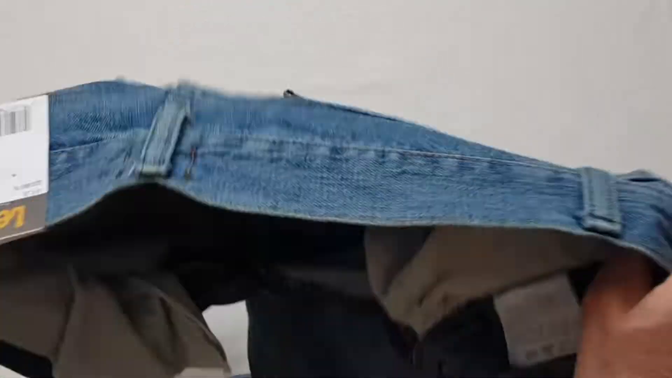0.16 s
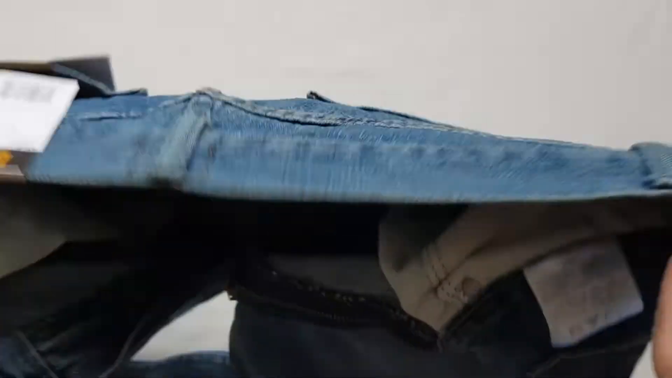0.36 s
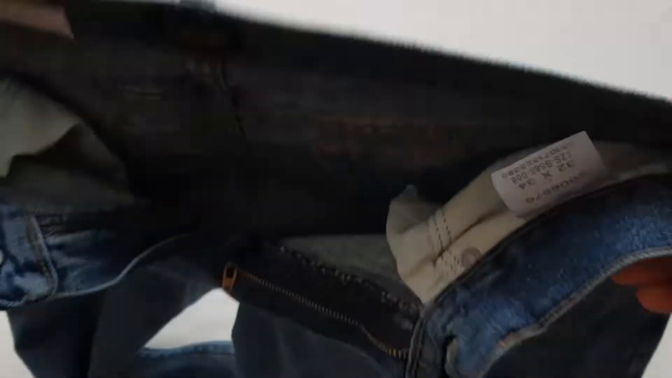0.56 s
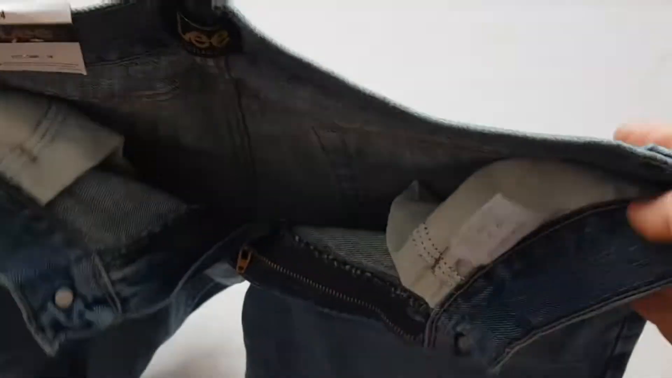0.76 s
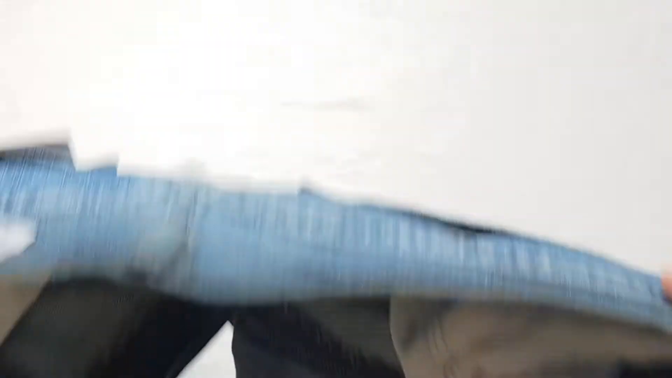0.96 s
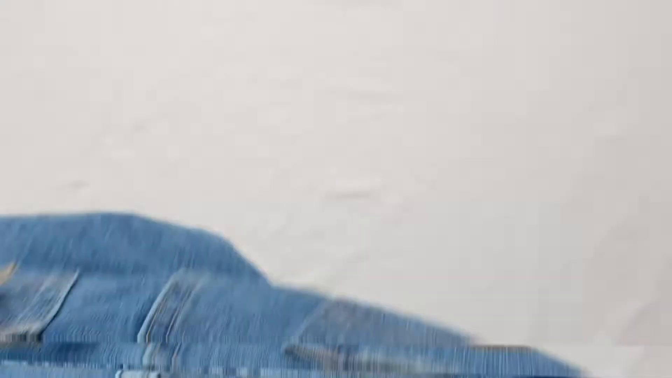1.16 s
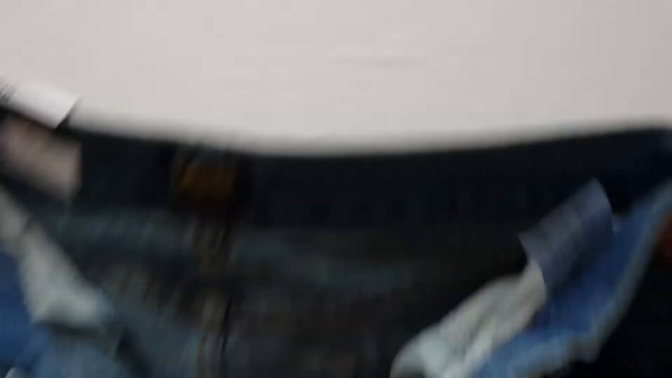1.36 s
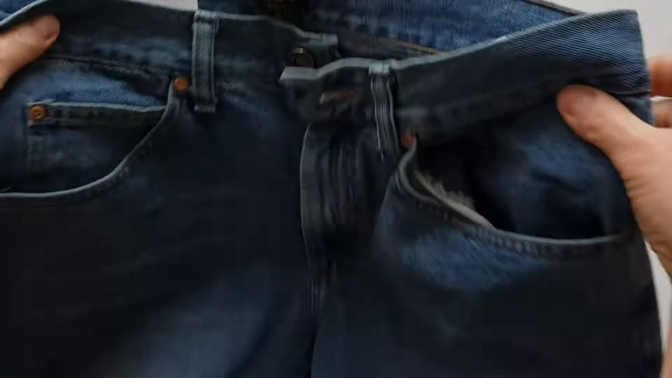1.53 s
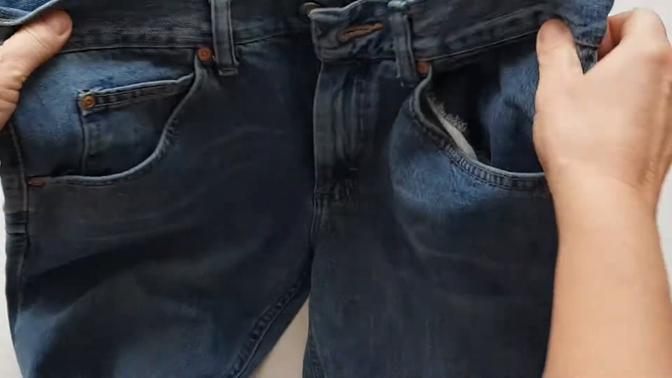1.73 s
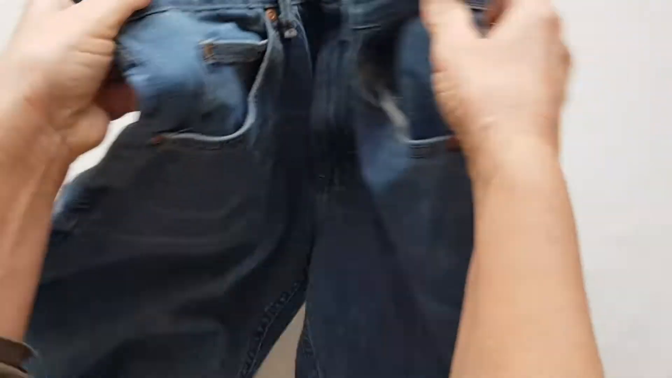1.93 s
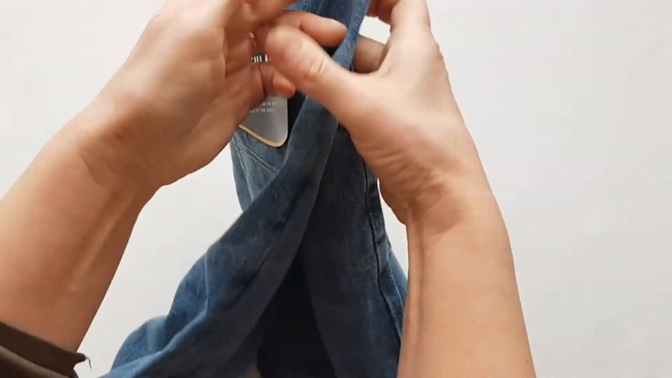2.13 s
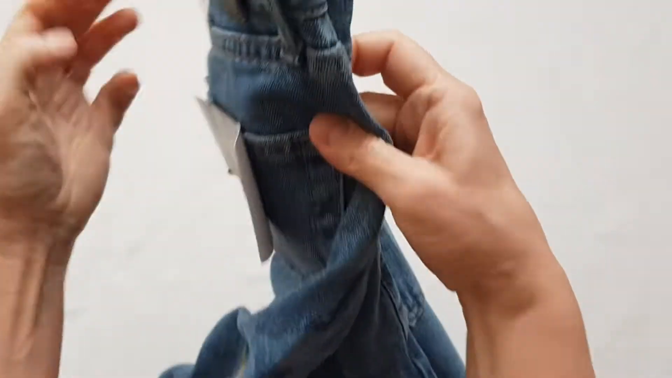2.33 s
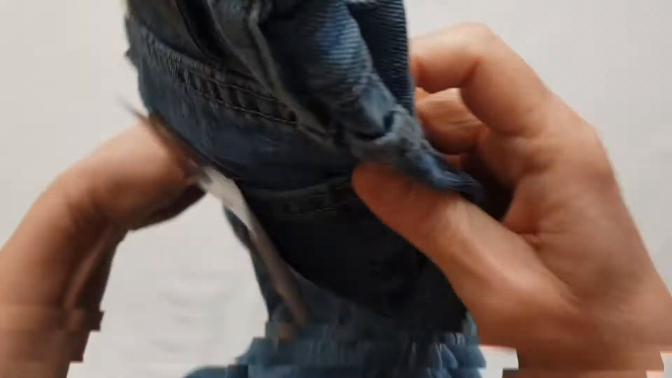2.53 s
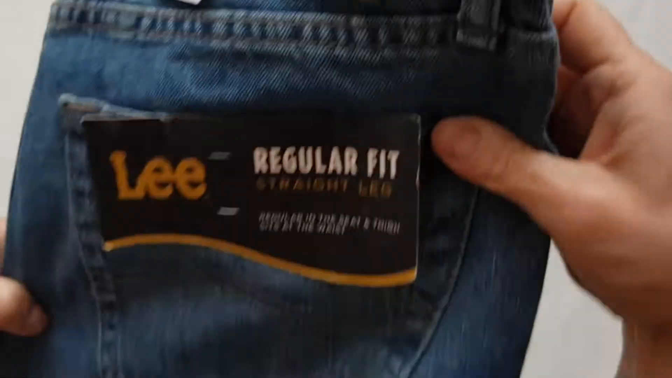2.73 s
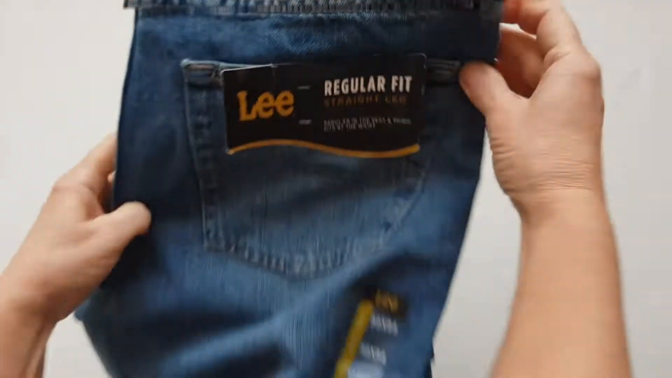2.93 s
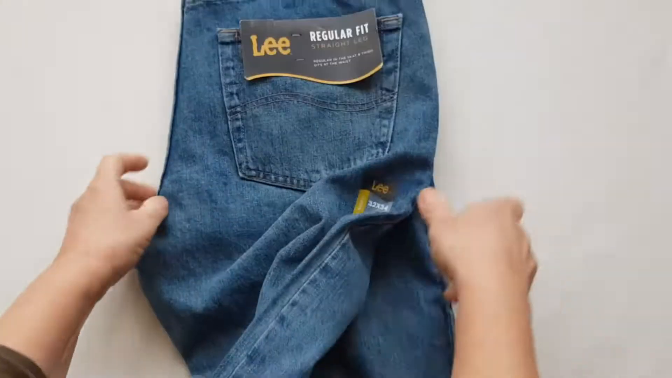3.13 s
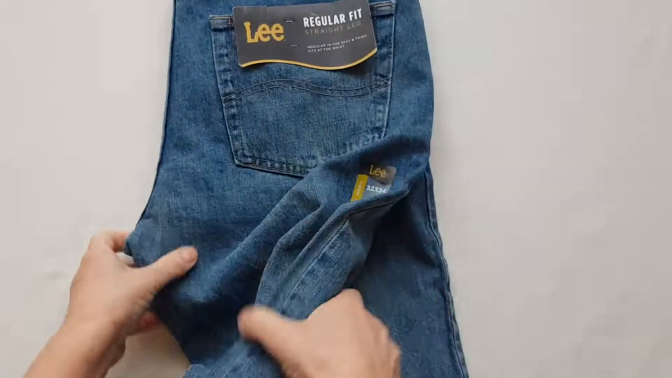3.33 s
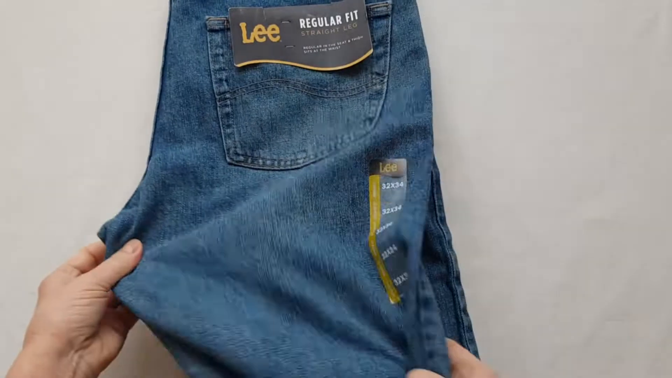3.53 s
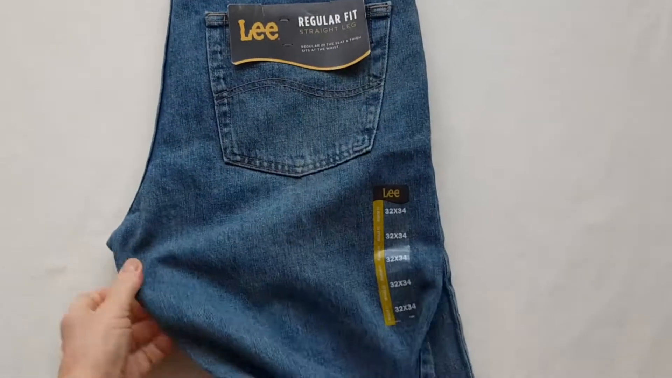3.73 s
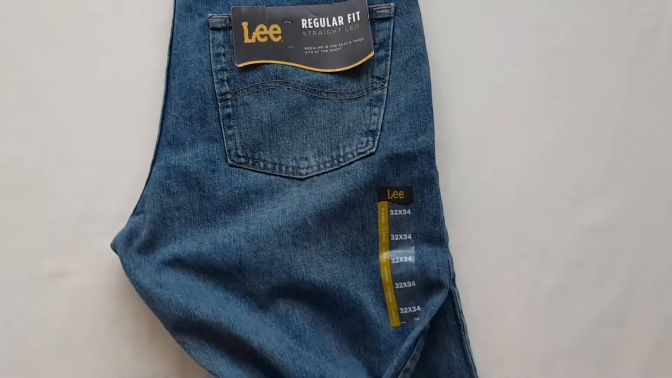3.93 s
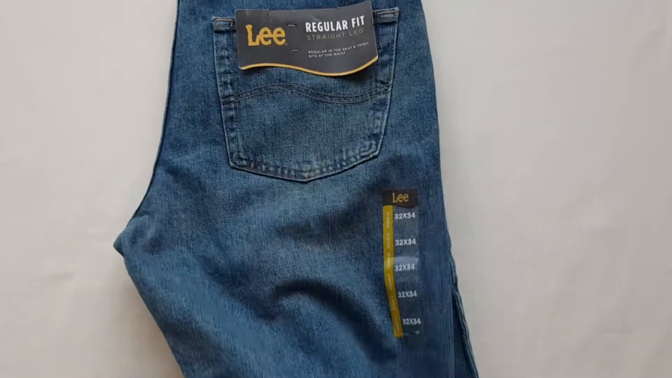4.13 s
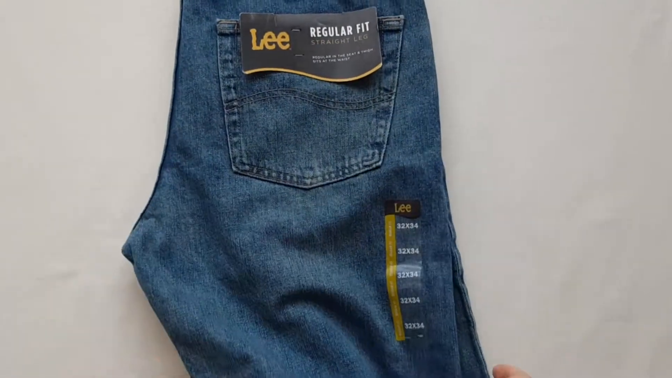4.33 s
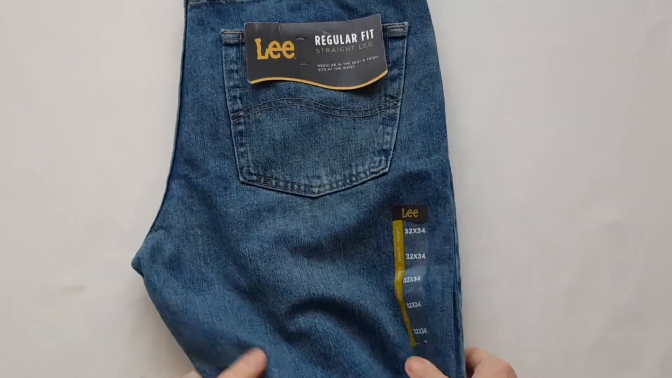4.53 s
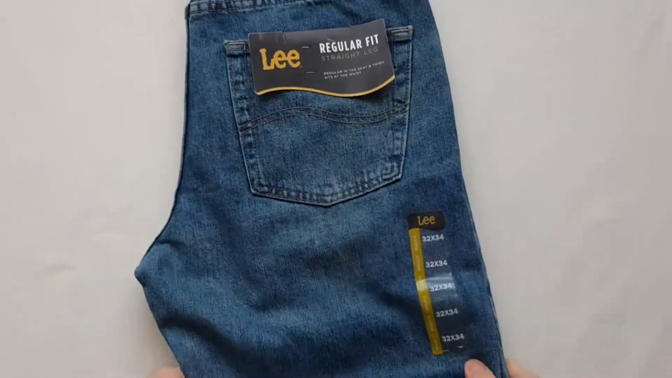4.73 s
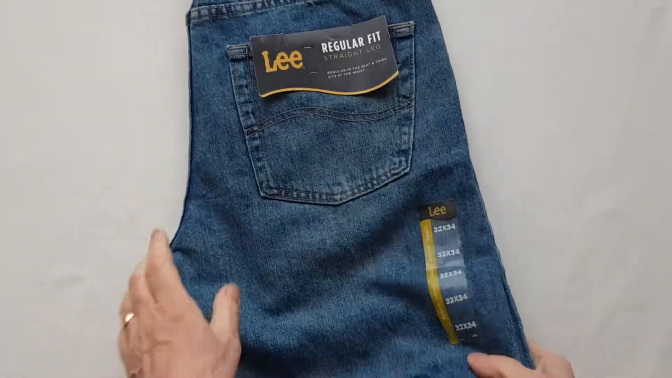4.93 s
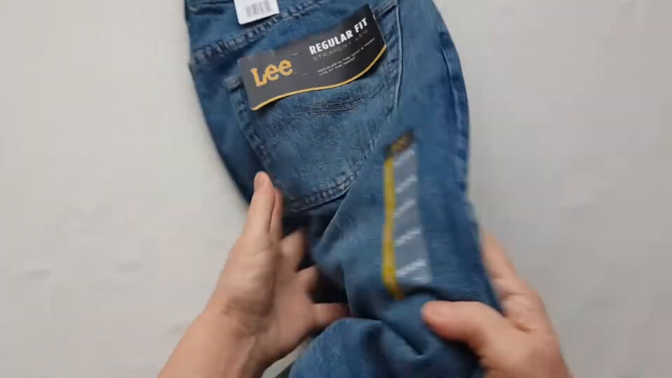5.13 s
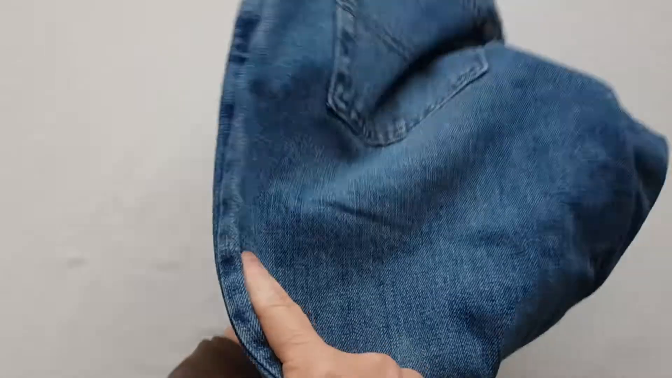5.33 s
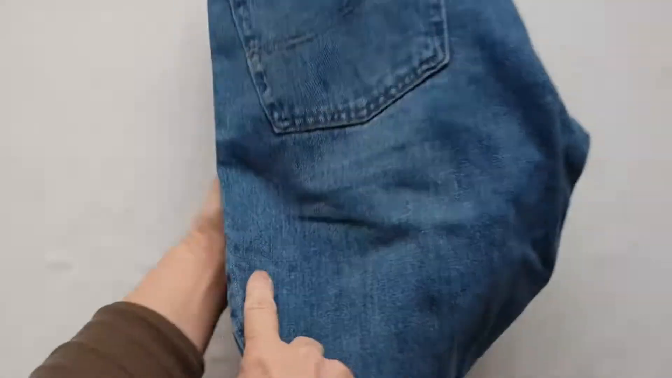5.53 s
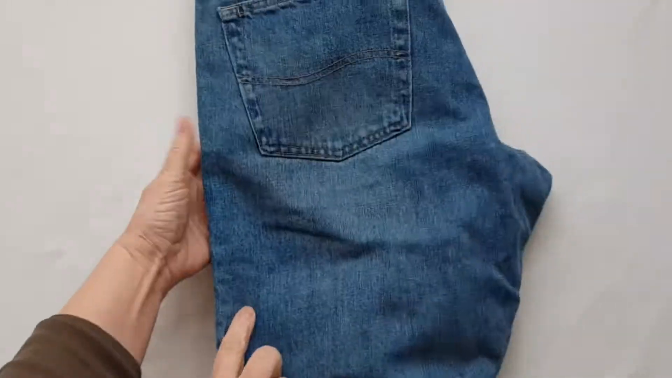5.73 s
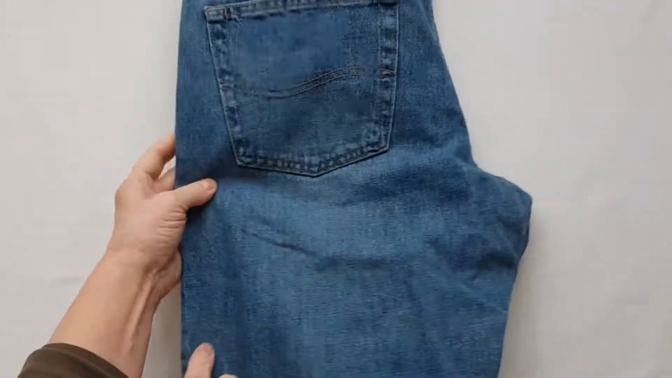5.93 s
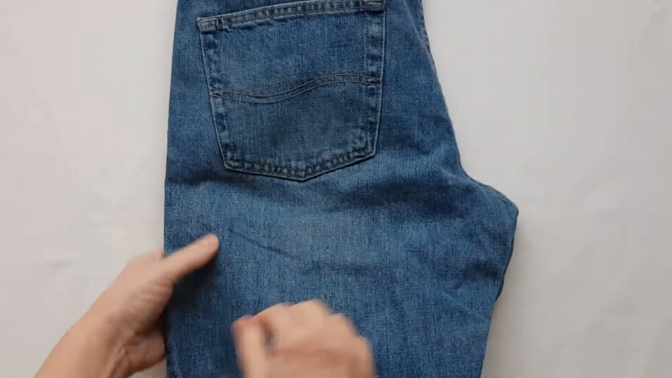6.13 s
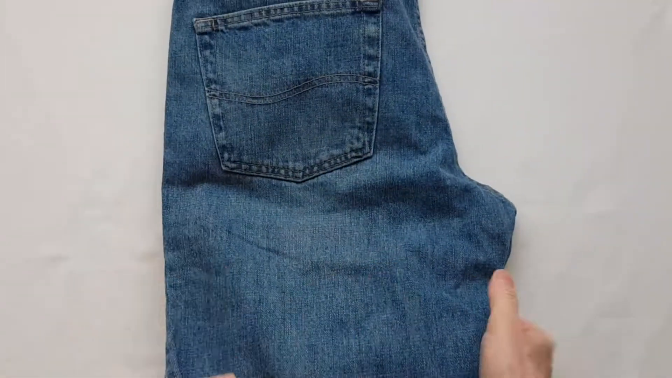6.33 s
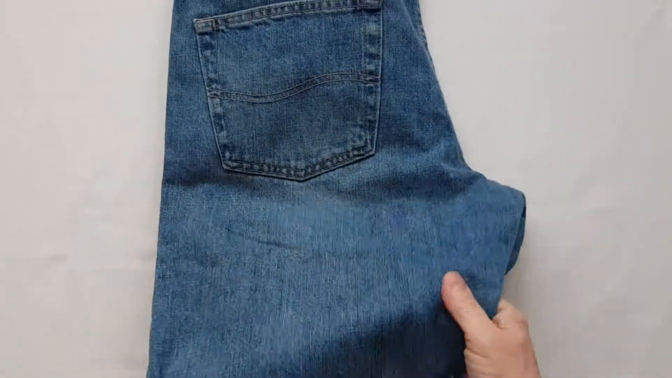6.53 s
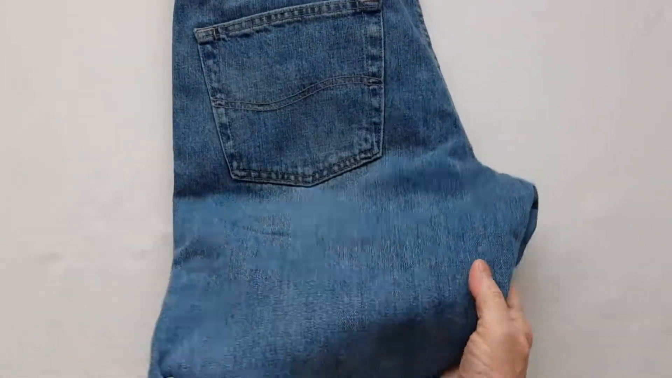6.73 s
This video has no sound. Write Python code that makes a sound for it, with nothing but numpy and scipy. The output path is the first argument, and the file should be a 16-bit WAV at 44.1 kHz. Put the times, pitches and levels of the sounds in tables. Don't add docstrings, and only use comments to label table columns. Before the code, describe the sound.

Thick denim being handled on a tabletop: muffled thuds, coarse dragging and dry crackles at first, a brief lull, then a strong double thud. A firm rap, a heavy cloth landing and the loudest woody knock follow with small rebounds. Afterwards soft brushing, little clicks and pats, one more solid flop, and quiet sliding. Close stereo pickup, short soft room echo, low steady hiss.

```python
import sys
import numpy as np
from scipy import signal
from scipy.fft import rfft, irfft, next_fast_len
from scipy.io import wavfile
from scipy.ndimage import uniform_filter1d

SR = 44100
rng = np.random.default_rng(int(sys.argv[2]) if len(sys.argv) > 2 else 0)


def int16_out(signal):
    q = np.round(np.clip(np.atleast_2d(signal).T, -1, 1) * 32767)
    wavfile.write(sys.argv[1], SR, q.astype(np.int16))


def voltage_ratio(decibels):
    exponent = np.asarray(decibels, float) / 20
    return 10 ** exponent


N = 298998

# [pitch_hz, level_db]
FLOOR_COLOUR = [(15, -32), (25, 18), (97, 13.5), (224, 1), (302, -18), (1020, -17), (1960, 2.5),
                (2790, -32), (4790, 1), (6110, -6), (12400, -1), (14900, 0.5), (16200, -10)]
# [centre_s, depth_db, half_length_s]
LULLS = [(0.62, 8, 0.11), (0.9, -3.5, 0.026), (1.293, -4, .04), (1.817, 5, .1), (2.366, 3.5, .08),
         (3.24, 10, 0.042), (3.79, 6, .06), (4.396, 11, 0.035), (4.864, 5.5, .08), (5.45, -1, 0.08),
         (6.2, 0, .1)]
# [pitch_hz, t60_s]
ROOM_DECAY = [(100, 1), (400, 0.3), (2000, 0.088), (10000, 0.17)]
# [pitch_hz, correlation]
ALIKE = [(100, 0.6), (500, 0.36), (1200, 0.017), (4000, 0)]
# [pitch_hz, level_db]
LEAN = [(60, 2), (600, 4.5), (1300, -1), (4400, 1.5), (8100, 12), (15000, 1)]
# [centre_hz, width_hz, depth_db]
PORT_NOTCHES = [(2740, 287, 2), (5760, 990, 1.5)]
# [pitch_hz, level_db]
DRAG_COLOUR = [(470, -5), (760, -6), (1000, -3), (1400, -3.5), (1800, -6.5), (2340, -18), (3960, -120)]
SCRAPE_COLOUR = [(1030, -21), (1750, -3.5), (2250, -4), (2900, -8.5), (3770, -13.5), (6380, -120)]
BRUSH_COLOUR = [(1530, -3), (2600, -4.5), (3050, -3), (3750, 0.5), (4050, 1.5), (5190, 0), (6800, -8.5),
                (8840, -42), (15000, -120)]
FIBRE_COLOUR = [(3530, -12.5), (6000, -8.5), (6660, -5), (7830, -3), (9090, -0.5), (10500, -5), (12300, 0),
                (15000, -7.5), (16200, -8)]
# [start_s, drag_db, rise_s, fall_s, scrape_over_drag_db]
DRAGS = [(-0.007, -45.5, 0.02, 0.063, -4), (0.165, -50, 0.047, 0.098, -2),
         (0.403, -69.5, 0.0028, 0.37, 0.5), (0.755, -61.5, 0.045, 0.05, 8),
         (1.069, -65.5, 0.028, 0.087, 11.5), (1.13, -58.5, 0.011, 0.07, 6.5),
         (1.33, -58.5, 0.0051, 0.17, 0), (2.028, -49.5, .006, 0.014, 5.5), (2.095, -64, .004, 0.035, 5),
         (1.488, -48.5, 0.067, 0.044, -2.5), (1.601, -49.5, 0.018, 0.044, -10),
         (1.984, -55, 0.0091, 0.096, 4.5), (2.543, -48, 0.0017, 0.059, -12),
         (2.69, -53.5, 0.13, 0.044, -5.5), (2.98, -63, 0.12, 0.018, -4.5), (3.07, -39, 0.017, 0.049, -5),
         (3.282, -60, 0.0068, 0.1, -12), (3.533, -55, 0.0017, 0.039, 2), (3.575, -56.5, 0.093, 0.07, 1.5),
         (3.902, -59, 0.017, 0.15, -4.5), (4.274, -61.5, 0.09, 0.055, -5.5),
         (4.43, -49, 0.0015, 0.069, -2.5), (4.621, -53, 0.057, 0.081, -6.5), (5.106, -49, 0.055, 0.12, -3),
         (5.585, -55, 0.04, 0.033, -3), (5.628, -44.5, 0.0055, 0.054, -9), (6.035, -61, 0.17, 0.036, -3),
         (6.43, -61.5, 0.15, 0.37, -3)]
# [start_s, brush_db, rise_s, fall_s, fibre_over_brush_db]
SWEEPS = [(-0.025, -54, 0.0019, 0.16, 0), (0.148, -58.5, 0.035, 0.49, -0.2), (0.767, -53.5, 0.041, 0.04, 4),
          (1.032, -53.5, 0.0061, 0.017, -5), (0.99, -59, 0.019, 0.054, 1.5), (1.09, -55.5, 0.033, .05, 1),
          (5.24, -59.5, 0.043, .03, -1), (1.135, -54, 0.017, 0.063, 3), (1.19, -59.5, 0.023, 0.14, 0.5),
          (1.35, -53, 0.014, .07, 1.5), (1.435, -57.5, 0.014, 0.016, 8), (1.47, -58, 0.015, 0.058, 0),
          (2.1, -52.5, 0.0042, 0.033, -11), (3.11, -50, .008, 0.021, -7), (3.89, -61, .03, 0.057, 0),
          (1.574, -60.5, 0.0081, 0.091, 1.7), (2.019, -57, 0.067, 0.12, 2),
          (2.219, -54.5, 0.019, 0.028, -0.5), (2.702, -55, 0.1, 0.052, 1.5), (2.887, -62.5, 0.032, 0.13, 5),
          (3.079, -49, 0.02, 0.027, -10.5), (3.339, -62.5, 0.024, 0.16, 2), (3.539, -52, 0.048, 0.068, -1),
          (4.025, -57.5, 0.14, 0.15, -3), (4.206, -58.6, 0.02, 0.054, 4.5),
          (4.428, -59, 0.00097, 0.043, -12), (4.711, -59, 0.084, 0.038, 2.5), (5.118, -56, 0.074, 0.12, 0),
          (5.649, -55.5, 0.063, 0.046, -2.5), (6.011, -62, 0.18, 0.077, 2), (6.465, -58, 0.089, 0.23, 0.5)]
# [start_s, level_db, brightness_db]
FLICKS = [
    (0.285, -64.5, 8.5),
    (1.126, -64, 3),
    (1.462, -44, -6.5),
    (1.979, -49.5, -6.5),
    (2.095, -59.5, 2),
    (2.542, -62, -12),
    (3.059, -56.5, 3),
    (4.428, -64, -4),
    (4.561, -65.5, 0),
    (4.656, -64, -17),
]
# [start_s, peak_db, pitch_hz, length_s]
SCUFFS = [(1.975, -49, 1400, 0.0084), (2.025, -47, 1300, 0.018), (4.5, -62.5, 970, .03),
          (5.582, -47.5, 2500, 0.04), (5.41, -57.5, 700, 0.044), (5.503, -58, 600, .03),
          (5.615, -55, 2300, .05), (0.76, -63, 300, .08), (3.93, -66, 4000, 0.067), (5.2, -63, 560, .05),
          (1.3, -59.5, 440, .05), (0.74, -59.5, 2150, .06), (1.4, -58, 440, 0.017), (6.27, -67, 1800, 0.13),
          (1.125, -52, 2200, 0.056), (1.35, -57, 4400, 0.035), (0.415, -59, 2300, 0.033),
          (5.95, -60, 1800, 0.077), (6.33, -57, 1700, .06), (6.4, -66, 450, 0.1), (5.86, -63, 1600, .06),
          (6.0, -62.5, 310, 0.17), (2.5, -58, 410, 0.064), (1.6, -59, 200, 0.062), (6.66, -58, 470, .1),
          (2.095, -58, 1200, 0.043), (2, -52, 830, 0.028)]
# [start_s, peak_db, pitch_hz, t60_s]
CRACKLES = [(0.021, -40, 1100, .012), (0.038, -38, 1100, 0.012), (0.174, -39.5, 1020, 0.036),
            (0.283, -48, 864, 0.013), (0.39, -45.5, 802, 0.0076), (0.42, -53, 1080, 0.016),
            (0.44, -48, 783, .012), (1.037, -48, 11300, 0.006), (1.0368, -39, 4480, .002),
            (2.575, -48, 1500, .008), (4.437, -56, 7500, .008), (4.432, -56, 4600, .012),
            (1.133, -50, 2220, .008), (1.166, -49, 4500, .005), (1.232, -52, 1410, 0.009),
            (1.243, -50, 9500, .004), (1.264, -51, 2140, 0.0061), (1.279, -50, 2260, 0.007),
            (1.323, -55, 2380, .008), (1.355, -50, 3710, 0.0086), (1.419, -49, 900, .01),
            (1.432, -41, 805, 0.014), (1.447, -51, 1200, .008), (1.4628, -30, 13500, .0015),
            (1.463, -39.5, 7000, 0.0044), (1.463, -35, 3320, 0.0065), (1.58, -53, 1140, .01),
            (1.59, -48, 1130, .01), (1.603, -48, 3600, .005), (1.611, -42, 860, 0.0093),
            (1.998, -42, 1500, .006), (2.027, -42, 1410, 0.0087), (2.034, -43, 1190, 0.0083),
            (3.043, -43, 999, .012), (3.084, -41, 867, 0.014), (3.115, -33, 1540, .008),
            (3.281, -53, 969, 0.011), (3.531, -46, 1020, .015), (3.609, -50, 1500, .006),
            (6.355, -48.5, 1600, 0.013), (5.051, -48, 557, 0.017), (5.065, -52, 520, .02),
            (4.36, -64, 4900, .008), (4.431, -49, 1100, 0.014), (4.657, -42, 910, 0.0088),
            (5.036, -53, 1080, .01), (5.281, -53, 850, 0.028), (5.589, -43, 2500, .008),
            (5.622, -35, 786, .012), (5.633, -39, 930, 0.013), (6.336, -61, 1620, .01)]
# [start_s, peak_db, pitch_hz, top_ring_db, t60_s]
TICKS = [(0.079, -57.5, 1590, 4.5, 0.0037), (1.036, -34, 3130, -6, 0.0022),
         (1.4631, -30.5, 1550, -19, 0.0033), (1.6022, -40.5, 1530, -22, 0.0026),
         (2.0937, -48.5, 1480, -27, 0.011), (2.541, -39.5, 1530, -40, 0.0063),
         (3.531, -54, 1460, -31.5, 0.003), (4.561, -52, 1400, -15, 0.004),
         (4.657, -50.5, 1950, -28, 0.0087), (6.354, -60, 1660, -22, 0.012), (6.454, -54, 1550, -19, 0.0091)]
# [start_s, peak_db, pitch_hz, t60_s]
THUMPS = [(0.012, -26, 111, 0.049), (0.17, -31.5, 150, 0.059), (0.325, -37, 160, 0.083),
          (1.446, -30.5, 109, 0.15), (1.59, -41, 137, 0.11), (2.004, -38, 162, 0.031),
          (3.045, -36.5, 124, 0.17), (3.105, -25, 115.4, 0.12), (3.131, -31, 128.3, 0.2),
          (3.531, -49.5, 150.6, 0.28), (6.37, -59.5, 140, .2), (4.442, -45.5, 164, 0.14),
          (4.5, -48, 164, 0.29), (5.545, -51.5, 124, .4), (5.636, -25.5, 141, 0.052),
          (5.658, -31.5, 128, 0.22), (5.77, -48.5, 138.3, 0.24), (5.985, -40.5, 144.4, 0.15),
          (6.08, -52, 190, 0.084), (1.175, -52, 90.5, 0.12), (0.845, -60.5, 130, 0.067)]
# [centre_hz, width_hz, level_db]
TABLE_FRAME = [(45.5, 36.5, -1.2), (73.5, 17.7, 0.66)]
TABLE_LOW = [(124, 14, -12), (164, 9.2, -10.5)]
TABLE_HIGH = [(224.4, 21, -7.5), (288.4, 6.4, 2.5), (365, 42, -1.5), (508, 34, -2.5), (596, 54, -6),
              (790, 132, -8.5), (1075, 13, -19)]
# [start_s, level_db, rise_s, fall_s]
SHOVES = [(0.024, -31, 0.075, 0.014), (0.2, -36, 0.044, 0.11), (0.85, -60.5, 0.028, 0.042),
          (1.21, -50, 0.041, 0.031), (2.25, -63.5, .05, 0.055), (3.7, -58, .04, .06),
          (5.35, -59, .03, 0.048), (1.422, -35.5, 0.033, 0.05), (2.019, -50, 0.047, 0.05),
          (2.592, -52, 0.035, 0.075), (3.099, -42, 0.034, 0.11), (3.52, -49, 0.015, 0.13),
          (4.536, -57.5, 0.094, 0.15), (5.127, -69, 0.071, 0.123), (5.653, -61, 0.06, 0.17),
          (5.676, -40, 0.0411, 0.038), (6.0, -56, 0.015, 0.05), (6.395, -66, 0.02, 0.04)]
# [start_s, seam_patter_db, rise_s, fall_s, low_modes_over_patter_db]
LANDINGS = [(-0.002, -29.5, 0.0031, 0.033, -4.5), (0.112, -51, 0.0052, 0.15, 2),
            (0.164, -33.5, 0.0016, 0.033, 1), (0.356, -42, 0.081, 0.057, 1),
            (1.175, -64, 0.0072, 0.047, -4), (1.471, -28, 0.011, 0.012, -13),
            (1.563, -49.5, 0.015, 0.079, -14), (2.02, -53, 0.037, 0.065, 5.5),
            (2.563, -51.5, 0.024, 0.14, -8.5), (3.0, -54, 0.024, 0.36, -13), (3.06, -28, 0.016, 0.061, 1),
            (3.526, -61, 0.0025, 0.042, -14), (3.67, -46.5, 0.12, 0.043, -3),
            (3.904, -61, 0.0137, 0.22, -7), (4.236, -52.5, 0.059, 0.014, -15), (4.436, -56, 0.011, 0.17, 5),
            (4.85, -62.5, .05, 0.099, -14), (5.06, -51.5, 0.095, 0.082, -27), (5.2, -58, 0.033, 0.041, -14),
            (6.1, -69, 0.047, 0.092, 1), (3.3, -56, .05, 0.059, -3), (5.635, -34.5, 0.024, 0.029, 0),
            (5.771, -50, 0.1, 0.085, 0.5), (5.975, -51.5, 0.0074, 0.042, 12), (6.364, -54, 0.01, 0.15, -14)]
# [start_s,
# peak_db, pitch_hz, t60_s]
KNOCKS = [(0.002, -37, 388.5, 0.18), (0.142, -38.5, 353, 0.075), (0.17, -35, 379.6, 0.14),
          (0.216, -34, 204, 0.055), (0.256, -33, 200, .03), (0.284, -34.5, 383, 0.03),
          (0.327, -30, 190, .03), (0.387, -32, 448, 0.023), (1.361, -32, 255, 0.035),
          (1.419, -25.5, 274, 0.029), (1.4465, -16, 230, 0.021), (1.4625, -13.5, 329, 0.025),
          (1.49, -33, 285, 0.0089), (1.587, -31.5, 428, 0.026), (2.028, -42.5, 352, 0.059),
          (2.091, -38, 367, 0.045), (3.063, -24, 408, 0.031), (3.087, -22.5, 212, 0.068),
          (3.1132, -15.5, 263, 0.02), (3.569, -32, 292, 0.072), (0.366, -33, 200, .03),
          (3.65, -29, 380, 0.028), (4.195, -51, 400, 0.057), (4.443, -42.5, 198, 0.074),
          (4.46, -38, 171, 0.048), (4.562, -30.5, 590, 0.018), (4.597, -30, 722, .013),
          (4.608, -37, 600, 0.013), (4.633, -34.5, 596, 0.023), (4.653, -36, 395, 0.025),
          (5.62, -23.5, 208, 0.033), (5.632, -19, 400, 0.036), (5.973, -35.5, 382, 0.045)]
# [start_s, peak_db, pitch_hz]
TAPS = [(0.354, -38, 640), (3.0214, -29.5, 481), (3.098, -28, 790), (0.141, -35, 810), (4.078, -47.5, 713),
        (4.953, -46.5, 540), (5.039, -42, 480), (0.389, -51, 704), (6.353, -54, 575), (6.416, -63, 480),
        (6.48, -46, 485), (6.547, -44, 510)]
# [start_s, peak_db, pitch_hz, t60_s]
RAPS = [
    (2.5408, -17, 490, .017),
    (3.5303, -4, 385, .018),
]
# [start_s, peak_db, pitch_hz, t60_s]
REBOUNDS = [
    (2.547, -32.5, 530, 0.055),
    (3.539, -19.5, 460, 0.025),
    (3.6085, -23.5, 577, .018),
    (3.646, -34, 479, 0.064),
    (3.705, -36, 300, 0.037),
    (3.631, -36, 560, 0.037),
]
# [pitch_ratio, level_db, t60_ratio]
RAP_MODES = [(1, 0, 1), (1.21, -22, 2.5), (0.63, -13, 1.5), (2.7, -16, 0.8)]


def unit(x):
    return x / np.sqrt(np.mean(x ** 2) + 1e-20)


def along(points, hz):
    f, v = np.transpose(points)
    return np.interp(np.log(hz + 1), np.log(f + 1), v)


def filtered(x, response):
    m = next_fast_len(N + SR // 2)
    return irfft(rfft(x, m) * response(np.fft.rfftfreq(m, 1 / SR)), m)[..., :N]


def modes(body):
    def response(f):
        total = 0
        for k, (centre, width, db) in enumerate(body):
            damping = 1j * f * width
            total = total + (-1) ** k * voltage_ratio(db) * damping / (centre ** 2 - f ** 2 + damping)
        return total
    return response


def add_at(out, start_s, sound):
    out[..., round(start_s * SR):][..., :sound.shape[-1]] += sound


def grains(rate, spread_db):
    size = voltage_ratio(spread_db * np.minimum(rng.exponential(size=(2, N)), 3)) * rng.standard_normal((2, N))
    return unit(size * (rng.random(N) < rate / SR))


def strokes(rows, follows=False, lingers=1):
    s, db, rise, fall, *extra = np.transpose(rows)[..., None]
    if extra:
        db = db + follows * extra[0]
    t = np.arange(0, N + 64, 64) / SR
    slope = lambda u: np.exp(np.clip(u, -50, 50))
    swell = voltage_ratio(db) / (slope((s - t) / abs(rise)) + slope((t - s) / abs(fall * lingers)))
    return np.interp(np.arange(N) / SR, t, np.sqrt(np.sum(swell ** 2, 0)))


def rush(source, colour, patchy_db):
    z = signal.stft(source, nperseg=512)[2]
    field = uniform_filter1d(rng.standard_normal(z.shape[1:]), 8, 0)
    field = uniform_filter1d(field, 10, 1)
    patches = voltage_ratio(patchy_db * np.minimum(unit(field), 2))
    pair = signal.istft(z * patches, nperseg=512)[1][:, :N]

    def mid_side(hz):
        turn = np.arccos(np.clip(along(ALIKE, hz), -1, 1)) / 2
        return voltage_ratio(along(colour, hz)) * [np.cos(turn), np.sin(turn)]
    mid, side = filtered(pair, mid_side)
    return unit(np.array([mid + side, mid - side]))


def floor():
    t = np.arange(N) / SR
    dip_db = sum(db * np.exp(-((t - s) / half) ** 2) for s, db, half in LULLS)
    hiss = rush(rng.standard_normal((2, N)), FLOOR_COLOUR, patchy_db=1.2)
    air = filtered(hiss, lambda hz: 1 / (1 + (11500 / (hz + 1)) ** 12))
    return voltage_ratio(-68.0) * (voltage_ratio(-dip_db) * (hiss - air) + voltage_ratio(-0.4 * dip_db) * air)


def room(x):
    hz, t, z = signal.stft(rng.standard_normal((2, SR // 2)), SR, nperseg=256)
    tail = signal.istft(z * voltage_ratio(-60 * t / along(ROOM_DECAY, hz)[:, None]), SR, nperseg=256)[1]
    tail = [tail[0] + 0.2 * tail[1], tail[0] - 0.097 * tail[1]] / np.linalg.norm(tail[0])
    delayed = np.pad(x.mean(0), (260, 0))[None]
    return signal.fftconvolve(delayed, tail, axes=1)[:, :N]


def rustle():
    pops = [(s, db, 0.00038, 0.022, bright_db) for s, db, bright_db in FLICKS]  # rise_s, fall_s
    dull, bright = strokes(pops), strokes(pops, True)
    drag = np.hypot(strokes(DRAGS), dull)
    scrape = np.hypot(voltage_ratio(-2) * strokes(DRAGS, True), dull)
    brush = np.hypot(strokes(SWEEPS), bright)
    fibre = np.hypot(voltage_ratio(-0.56) * strokes(SWEEPS, True, lingers=0.86), bright)
    # gain, colour, share of grains, patchiness in dB
    layers = [(drag, DRAG_COLOUR, 0.94, 2.35), (scrape, SCRAPE_COLOUR, 0.92, 3.0),
              (brush, BRUSH_COLOUR, 0.53, 2.06), (fibre, FIBRE_COLOUR, 0.26, 2.1)]
    out = 0
    for gain, colour, share, patchy_db in layers:
        threads = rng.standard_normal((2, N)) + share * grains(900, spread_db=0.0)
        out = out + gain * rush(threads, colour, patchy_db)
    return voltage_ratio(1.0) * out


def scuffs():
    out = np.zeros((2, N + SR))
    cycles_in_step = 4.5
    for s, db, hz, length in SCUFFS:
        t = np.arange(round(3 * length * SR)) / SR
        wander = rng.standard_normal((2, len(t)))
        rough = unit(uniform_filter1d(wander, size=round(cycles_in_step * SR / hz)))
        swell = 2.42 * (t / length * 3) * np.exp(-t / length * 3)
        add_at(out, s, voltage_ratio(db) * swell * rough * np.sin(2 * np.pi * hz * t))
    return out[:, :N]


def crackles():
    out, t = np.zeros((2, N + SR)), np.arange(SR // 40) / SR
    pans_db = rng.normal(0, 1.1, len(CRACKLES))
    for (s, db, hz, t60), pan_db in zip(CRACKLES, pans_db):
        overtone = 0.13 * np.sin(2 * np.pi * min(1.86 * hz, 15000) * t)
        snap = voltage_ratio(db - 60 * t / t60) * (np.sin(2 * np.pi * hz * t) + overtone)
        add_at(out, s, voltage_ratio([[pan_db], [-pan_db]]) * 1.3 * snap)
    return out[:, :N]


def ticks():
    out, t = np.zeros((2, N + SR)), np.arange(SR // 20) / SR
    for s, db, hz, top_db, t60 in TICKS:
        snap = voltage_ratio(-60 * t / t60) * (np.sin(2 * np.pi * hz * t) + 0.2 * np.sin(2 * np.pi * 4100 * t))
        edge = 0.5 * voltage_ratio(-60 * t / 0.0019) * np.sin(2 * np.pi * 13400 * t)
        ring = voltage_ratio(-60 * t / 0.0063) * np.sin(2 * np.pi * 11200 * t)
        spray = 0.48 * voltage_ratio(-60 * t / 0.0062) * rng.standard_normal((2, len(t)))
        onset = 1 - np.exp(-t / 0.00022)
        add_at(out, s + 0.0007, voltage_ratio(db + 10.0) * onset * (snap + voltage_ratio(top_db) * (ring + spray + edge)))
    return out[:, :N]


def thumps():
    out, t = np.zeros(N + SR), np.arange(SR // 2) / SR
    onset = 1 - np.exp(-t / 0.0023)
    for s, db, hz, t60 in THUMPS:
        add_at(out, s, voltage_ratio(db + 5.5 - 60 * t / t60) * onset * np.sin(2 * np.pi * hz * t))
    return out[:N]


def table():
    weight = voltage_ratio(-5) * strokes(LANDINGS, True, lingers=1.24)
    patter = voltage_ratio(-5.0) * strokes(LANDINGS)
    # gain, modes, pats per second, side level in dB
    layers = [(strokes(SHOVES), TABLE_FRAME, 1500, -14), (weight, TABLE_LOW, 1500, -15),
              (patter, TABLE_HIGH, 900, -10)]
    out = 0
    for gain, body, rate, side_db in layers:
        pats = grains(rate, spread_db=1.5)
        scale = np.std(filtered(pats, modes(body)))
        mid, side = filtered(gain * pats, modes(body)) / scale
        out = out + mid + voltage_ratio(side_db) * side * [[1], [-1]]
    return voltage_ratio(0.5) * out


def knocks():
    out, t = np.zeros((2, N + SR)), np.arange(SR // 4) / SR
    partials = [(0.992, 3, 0.68), (0.638, -10.5, 1.5), (1.21, -14.5, 1.76), (2.39, -2.5, 0.2), (4.4, -29, 0.45)]
    taps = [(s, db, hz, 17.7 / hz) for s, db, hz in TAPS]
    for s, db, hz, t60 in KNOCKS + taps:
        rise = (1 - np.exp(-t * hz * 1.34)) ** 2
        thud = sum(voltage_ratio(level_db - 60 * t / (t60 * life)) * -np.sin(2 * np.pi * hz * ratio * t)
                   for ratio, level_db, life in partials)
        add_at(out, s + 0.0015, voltage_ratio(db + 1.5) * rise * thud)
    return out[:, :N]


def raps():
    out, t = np.zeros(N + SR), np.arange(SR // 4) / SR
    for s, db, hz, t60 in RAPS + REBOUNDS:
        rise = (1 - np.exp(-t * hz * 1.2)) ** 2
        ring = sum(voltage_ratio(level_db - 60 * t / (t60 * life)) * -np.sin(2 * np.pi * hz * ratio * t)
                   for ratio, level_db, life in RAP_MODES)
        add_at(out, s, voltage_ratio(db) * rise * ring)
    return out[:N]


def scene():
    hiss, sharp, dull, clean = floor(), ticks(), knocks(), raps()
    echo = room(voltage_ratio(-7) * dull + voltage_ratio(-33) * sharp + voltage_ratio(-12) * clean)
    cloth = rustle() + scuffs() + crackles()
    return hiss + echo + cloth + sharp + thumps() + table() + dull + clean


def low_pass(x):
    return signal.sosfilt(signal.butter(12, 16970, fs=SR, output="sos"), x)


def record(dry):
    def microphones(hz):
        lean = voltage_ratio([along(LEAN, hz) / 2, -along(LEAN, hz) / 2])
        bass_cut = (1j * hz / (42 + 1j * hz)) ** 3
        ports = voltage_ratio(-sum(db * np.exp(-((hz - c) / w) ** 2) for c, w, db in PORT_NOTCHES))
        return lean * ports * bass_cut * (hz < 15760)
    return low_pass(filtered(dry, microphones))


dry = scene()
out = record(dry)
int16_out(out)
```